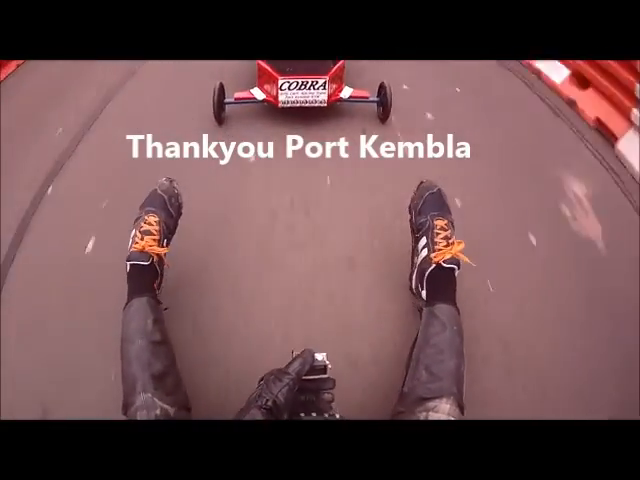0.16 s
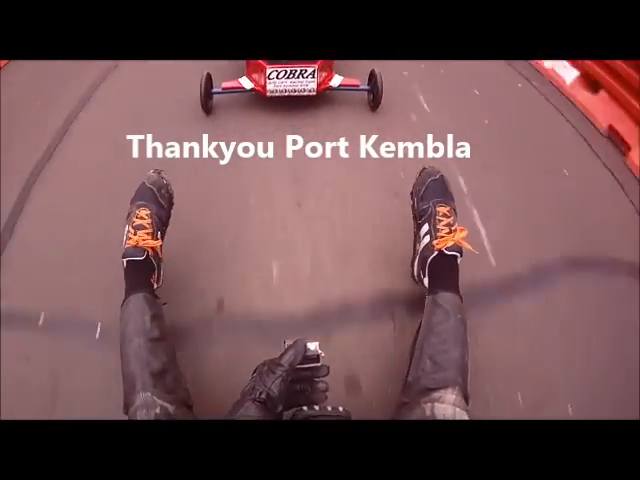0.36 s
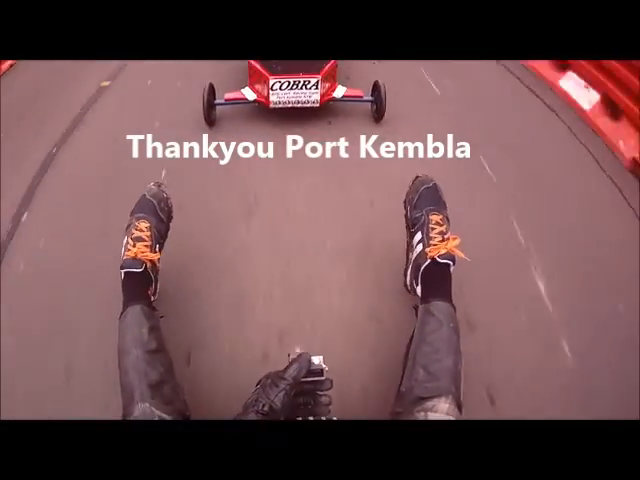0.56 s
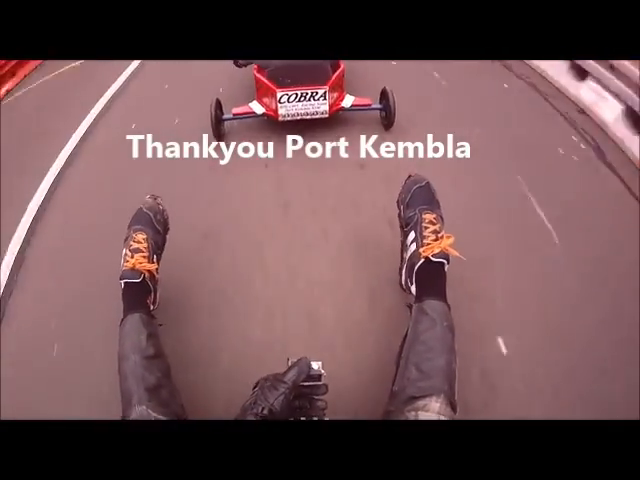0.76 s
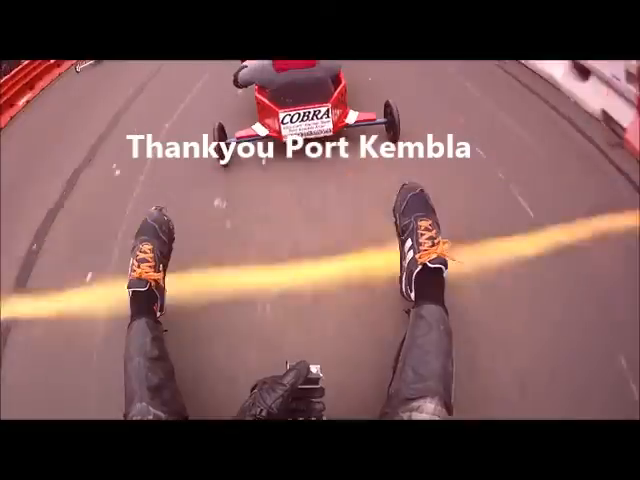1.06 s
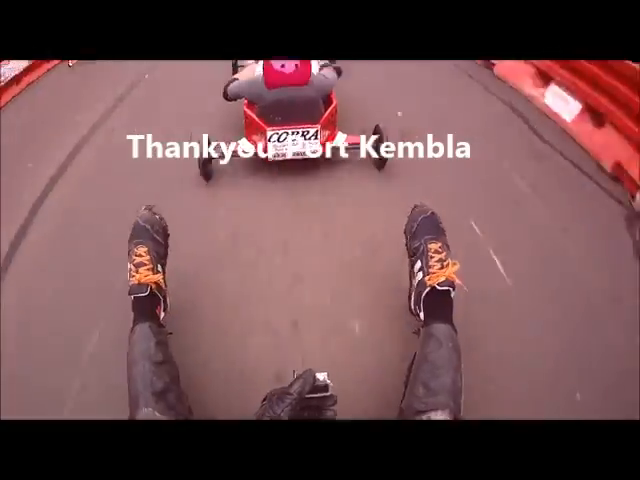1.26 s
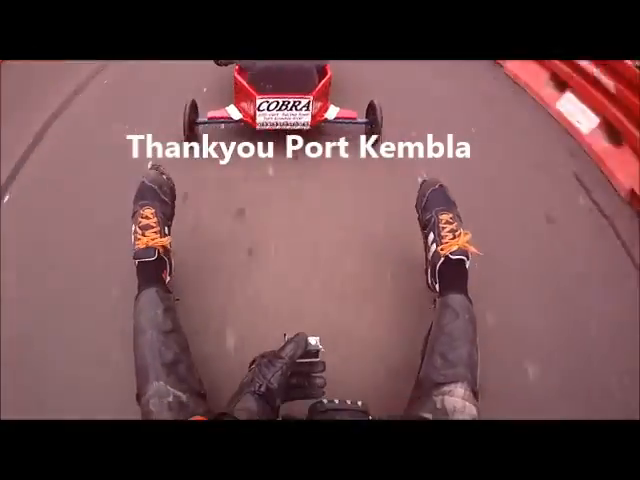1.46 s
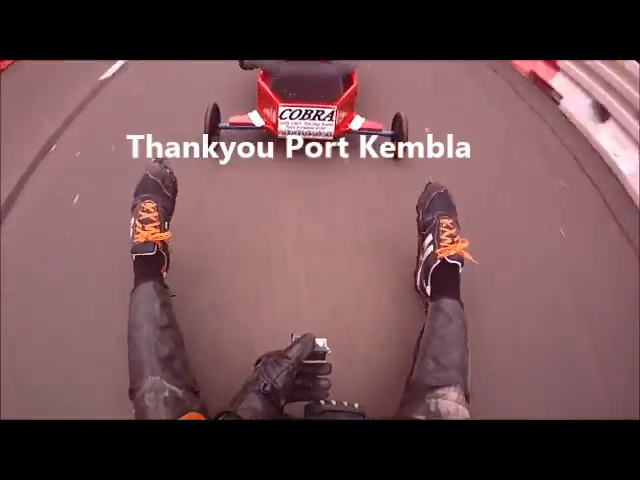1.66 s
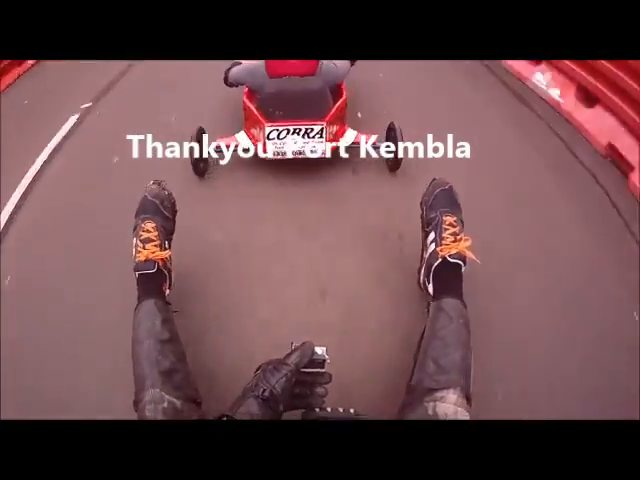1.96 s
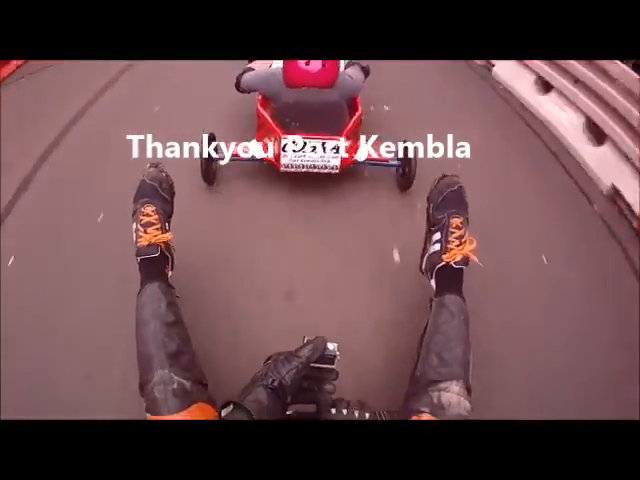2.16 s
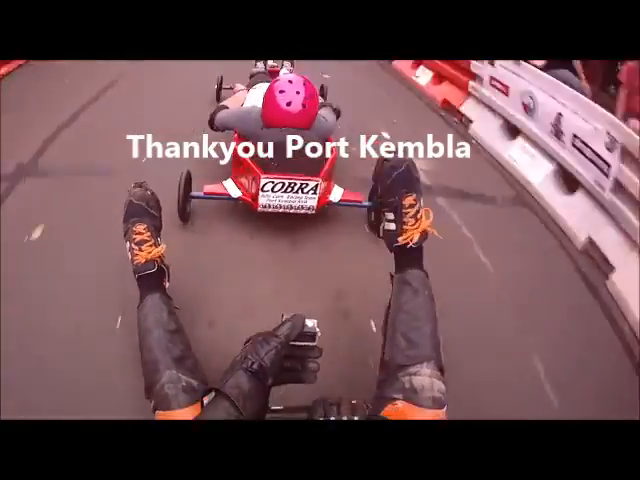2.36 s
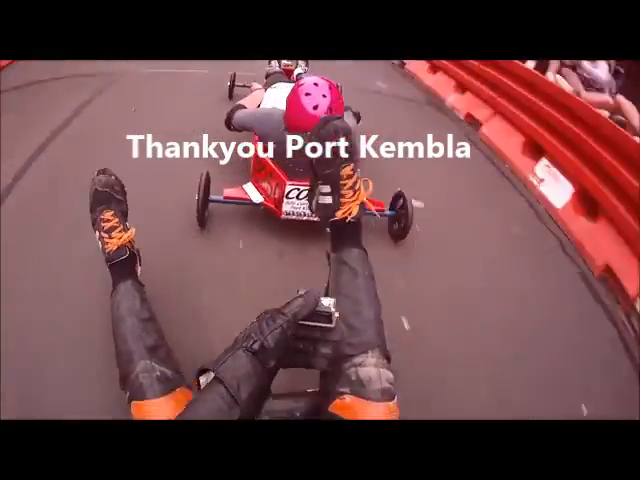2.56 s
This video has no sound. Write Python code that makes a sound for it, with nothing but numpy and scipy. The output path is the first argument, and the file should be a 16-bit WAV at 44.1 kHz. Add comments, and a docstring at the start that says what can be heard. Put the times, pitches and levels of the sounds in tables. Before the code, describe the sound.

A gravity cart rumbles down asphalt, heard from the rider's camera; wind roars and rings over the housing at first, a bump thuds, grit ticks, then wind dulls away, leaving hollow rolling and weak knocks.

```python
"""A gravity cart rolls down an asphalt road, heard from the rider's camera.
From the start the wheels drum a low rumble (shaped noise) with a gliding drone (an unsteady sine) and a boom,
while wind (moving filtered noise) rushes over the camera housing and makes it ring. Specks of grit tick faintly,
bumps jolt the frame (decaying modes), and a tyre scuffs (bursts of hiss) as the wind swells once more.
The wind then dulls and dies away; weak knocks fall at random throughout, clearer ones near the end."""
import sys
import numpy as np
from scipy import signal
from scipy.fft import rfft, irfft, next_fast_len
from scipy.io import wavfile
from scipy.ndimage import uniform_filter1d, minimum_filter1d, map_coordinates

SR = 44100
rng = np.random.default_rng(int(sys.argv[2]) if len(sys.argv) > 2 else 0)


def waveform_to_disk(signal):
    """Save audio, clipped to [-1, 1], as 16-bit WAV at the path in sys.argv[1]."""
    frames = np.transpose(np.atleast_2d(signal))
    scaled = np.clip(frames, -1, 1) * 32767
    samples = np.round(scaled).astype(np.int16)
    wavfile.write(sys.argv[1], SR, samples)


N = 119952  # length in samples


def amp(db):
    """Decibels to gain."""
    return 10 ** (np.asarray(db) / 20)


def unit(x):
    """Scaled to rms 1."""
    return x / np.sqrt(np.mean(x ** 2) + 1e-20)


def along(points, hz):
    """(Hz, value) points read on a log frequency axis."""
    f, value = np.transpose(points)
    return np.interp(np.log(hz + 1), np.log(f + 1), value)


def curve(rows, t=None, column=1):
    """One column of a time table, at every sample or at times t."""
    rows = np.asarray(rows)
    times = np.arange(N) / SR if t is None else t
    return np.interp(times, rows[:, 0], rows[:, column])


def wobble(rate):
    """A smooth random curve through `rate` random knots a second."""
    knots = rng.standard_normal(1024)
    return map_coordinates(knots, [np.arange(N) * rate / SR + 2], mode="mirror")


def filtered(x, response):
    """x times a gain that depends on frequency."""
    size = next_fast_len(N + SR // 4)
    hz = np.fft.rfftfreq(size, 1 / SR)
    return irfft(rfft(x, size) * response(hz), size)[..., :N]


def swept(x, gain_db, size=1024):
    """x through a filter that moves in time: gain_db(Hz, s)."""
    hz, t, bands = signal.stft(x, SR, nperseg=size)
    shaped = bands * amp(gain_db(hz[:, None] + 1, t))
    return signal.istft(shaped, SR, nperseg=size)[1][..., :N]


def noise(colour):
    """Nearly mono stereo noise of rms 1 with a given spectrum."""
    # stereo width of the noise: f/Hz, side relative to mid/dB
    side_width = [(35, -15), (65, -35), (160, -51), (330, -22.5), (600, -34), (1300, -24.5), (3000, -17.5),
                  (5000, -20), (9000, -11.5), (14000, -12.5)]
    mid, side = filtered(rng.standard_normal((2, N)), lambda hz: amp(along(colour, hz)))
    side = filtered(side, lambda hz: amp(along(side_width, hz)))
    return unit(np.array([mid + side, mid - side]))


def wheels():
    """The grain of the asphalt drums unevenly through the frame, over the chassis' deep boom."""
    # rumble of the wheels, before lift and shake: t/s, level/dB
    roll = [(0, -22), (.11, -22), (.3, -21), (.43, -16.5), (.57, -27), (.63, -14.5), (.73, -26),
            (.83, -15.5), (.91, -20), (1.0, -18.5), (1.15, -20), (1.27, -16.5), (1.47, -19), (1.58, -18),
            (1.9, -22), (1.98, -19.5), (2.16, -23.5), (2.3, -19), (2.55, -23), (2.68, -18.5)]
    # spectral shape of the rumble: f/Hz, relative level/dB
    rumble_colour = [(20, -47.5), (50, -29.5), (74, -19), (98, -5), (165, -0.5), (270, -1), (400, -5),
                     (620, -20.5), (1000, -34.5), (1500, -50.5), (2200, -73), (4000, -89)]
    # deep boom of the chassis: t/s, level/dB
    boom_level = [(0, -48.5), (.12, -38), (.19, -45.5), (.27, -32), (.37, -41), (.5, -44), (.68, -46.5),
                  (.8, -40.5), (.86, -31.5), (.92, -40), (1.12, -36), (1.3, -31), (1.36, -38), (1.9, -38),
                  (2.16, -39.5), (2.45, -36), (2.51, -42), (2.69, -36)]
    # spectral shape of the boom: f/Hz, relative level/dB
    boom_colour = [(18, -28), (30, -19), (39, -17.5), (48, 1), (60, 1.5), (70, -11.5), (90, -32.5),
                   (200, -91)]
    lift_db, shake_db, shakes_per_s = 0.5, 0.5, 46
    patchy_db = 1  # rms of the band swells

    def patches(hz, t):
        """Random swells of single bands, in dB."""
        field = rng.standard_normal((len(hz), len(t)))
        field = uniform_filter1d(field, size=4, axis=0)
        field = uniform_filter1d(field, size=5, axis=1)
        return patchy_db * unit(field)

    rumble = unit(swept(noise(rumble_colour), patches, size=2048))
    rumble_db = lift_db + curve(roll) + shake_db * wobble(shakes_per_s)
    boom = noise(boom_colour) * amp(curve(boom_level))
    return rumble * amp(rumble_db) + boom


def drone():
    """A hollow, narrow band glides up and down inside the rumble, unsteady in pitch and strength."""
    # path of the drone, before the pitch jitter: t/s, f/Hz, level/dB
    glide = [(0, 199.6, -27), (.17, 198.1, -29.5), (.3, 373.6, -23), (.37, 281.3, -23.5), (.45, 385.1, -22),
             (.55, 209.3, -28.5), (.62, 200.3, -20), (.74, 230, -28), (.82, 172.4, -19.5),
             (.87, 330.2, -29), (.95, 192.5, -27), (1.03, 278.5, -33), (1.07, 260, -22), (1.13, 225, -19.5),
             (1.18, 171.3, -23), (1.25, 150, -19), (1.31, 230, -24.5), (1.38, 260.5, -20.5),
             (1.47, 200, -30.5), (1.54, 214.2, -29.5), (1.62, 300, -29), (1.71, 245, -33),
             (1.78, 164.5, -27.5), (1.86, 157.9, -23), (1.93, 190.1, -26), (2.03, 278, -22),
             (2.08, 278.2, -26.5), (2.15, 184.5, -26.5), (2.3, 168.5, -22), (2.41, 172.1, -26.5),
             (2.49, 226.3, -25.5), (2.59, 249.2, -24.5), (2.68, 172.8, -25.5)]
    waver, wavers_per_s, jitter_hz = .4, 50, 15
    hz = curve(glide) + jitter_hz * wobble(wavers_per_s)
    # complex strength: amplitude and phase both waver
    strength = 1 + waver * (wobble(wavers_per_s) + 1j * wobble(wavers_per_s))
    tone = np.real(strength * np.exp(2j * np.pi * np.cumsum(hz) / SR))
    return unit(tone) * amp(curve(glide, column=2))


def wind():
    """Air over the housing: a rush and a ringing that dull as it weakens, a low roar and a thin hiss."""
    # wind, before lift, tilt and flutter: t/s, level/dB, brightness/dB per octave above the pivot
    gusts = [(0, -28, 1.2), (.08, -28, -2.5), (.25, -28.5, -3), (.33, -30.5, -3.5), (.4, -31, -3.5),
             (.49, -34.5, -4.5), (.53, -40.5, -5.5), (.66, -34, -8.5), (.76, -37.5, -7.5),
             (.79, -38.5, -6.5), (.84, -36, -9.5), (.865, -43.5, -6), (1.15, -46.5, -11),
             (1.45, -56.5, -11.5), (1.85, -65.5, -10.5), (2.69, -75.5, -14.5)]
    # spectral shape of the rush, before ripple and tilt: f/Hz, relative level/dB
    rush_colour = [(150, -43), (400, 4), (700, -2.5), (1100, -3), (1800, -4.5), (2700, -7), (3600, -13),
                   (4800, -19), (6200, -31), (9000, -59)]
    # resonances of the housing, before tilt: f/Hz, half-width at half amplitude/Hz, relative level/dB
    housing = [(638, 21, -2.5), (1168, 20, -5), (1213, 6, -8.5), (1325, 9, -0.5), (1403, 3.5, 6.5),
               (1477, 6, -5.5), (1560, 7, -5), (2154, 5, -3), (2596, 9.5, -3), (2870, 8, -5.5),
               (3270, 10, -7), (3470, 5.4, -7.5), (3820, 15, -15)]
    # low roar: t/s, level/dB
    roar_level = [(0, -29.5), (.15, -28), (.3, -21), (.5, -23), (.58, -25.5), (.68, -24), (.85, -25.5),
                  (1.1, -29), (1.5, -39), (2.69, -47.5)]
    # spectral shape of the roar: f/Hz, relative level/dB
    roar_colour = [(150, -40), (300, -8.5), (420, -2.5), (680, -10.5), (1000, -18), (2000, -50.5),
                   (4000, -92)]
    # thin hiss of the air, before flutter: t/s, level/dB
    hiss_level = [(0, -58), (.12, -63), (.28, -57.5), (.36, -58), (.49, -61.5), (.55, -68), (.7, -72.5),
                  (.9, -79), (2.69, -100)]
    # spectral shape of the hiss: f/Hz, relative level/dB
    hiss_colour = [(2000, -20.5), (5000, 1), (8500, 0), (11000, -0.5), (13000, -4), (16000, -10)]
    pivot_hz, lift_db = 1236, 1.5
    flutter_db, flutters_per_s = -1.63, 100
    ring_db, ring_growth = -33, 1.17  # level in the strongest wind before tilt; dB per dB of wind
    ripple_db, ripple_spacing_hz = 2.5, 21.56  # countless weaker resonances

    level_db = curve(gusts)

    def tilt(hz, t):
        """Brightness above the pivot, in dB."""
        octaves = np.log2(np.maximum(hz / pivot_hz, 1))
        return curve(gusts, t, column=2) * octaves

    def ripple(hz):
        """Random peaks and dips along the spectrum, as gain."""
        heights = rng.standard_normal(size=4096)
        return amp(ripple_db * map_coordinates(heights, [hz / ripple_spacing_hz], mode="mirror"))

    def modes(hz):
        """Sum of the housing's resonance peaks, as gain."""
        return sum(amp(db) / (1 + ((hz - f) / width) ** 2) for f, width, db in housing)

    rush = unit(filtered(noise(rush_colour), ripple))
    rush = swept(rush, tilt) * amp(lift_db + level_db)
    ring = unit(filtered(rng.standard_normal(N), modes))
    ring = swept(ring, tilt) * amp(ring_db + ring_growth * (level_db - level_db.max()))
    roar = noise(roar_colour) * amp(curve(roar_level))
    hiss = noise(hiss_colour) * amp(curve(hiss_level))
    flutter = amp(flutter_db * wobble(flutters_per_s))
    return (rush + hiss) * flutter + ring + roar


def noise_floor():
    """A faint, steady bed of noise."""
    # spectral shape of the floor: f/Hz, relative level/dB
    floor_colour = [(1000, -7), (5000, -9.5), (9500, -10), (13000, -2), (16000, -5.5)]
    return amp(-74) * noise(floor_colour)


def taps(events, colour):
    """Short contacts: a sharp push and a tiny scatter, through a causal filter, each scaled to its peak."""
    scatter_db, scatter_t60_s = -21.5, 0.0024
    size = 2048
    t = np.arange(size) / SR
    # folding the cepstrum makes the filter minimum phase, so the push comes first
    cepstrum = irfft(np.log(amp(along(colour, np.fft.rfftfreq(size, 1 / SR)))))
    fold = np.r_[1, np.full(size // 2 - 1, 2), np.zeros(size // 2)]
    body = np.exp(rfft(cepstrum * fold))
    out = np.zeros(N + size)
    for s, db in events:
        decay = np.exp(-np.log(1000) * t / scatter_t60_s)
        push = (t == 0) + amp(scatter_db) * rng.standard_normal(size) * decay
        tap = irfft(rfft(push) * body)
        out[round(s * SR):][:size] += amp(db) * tap / np.abs(tap).max()
    return out[:N]


def knocks():
    """Dull knocks in the frame, and many weaker ones at random moments."""
    # clearer knocks: t/s, peak level/dB
    knock_times = [(1.868, -43), (1.947, -39.5), (2.126, -40.5), (2.442, -44.5), (2.53, -43),
                   (2.534, -35.5)]
    # spectral shape of a knock: f/Hz, relative level/dB
    knock_colour = [(200, -8), (700, 8), (1400, -0.5), (2300, -20), (4000, -33.5), (9000, -53.5)]
    small_db, spread_db = -49.5, 7  # middle peak level, and how far it strays either way
    small = [(u * (N - 1) / SR, small_db + spread_db * (2 * v - 1)) for u, v in rng.random((30, 2))]
    return taps(list(knock_times) + small, knock_colour)


def grit():
    """Specks of grit hit with sharp, bright ticks."""
    # ticks: t/s, peak level/dB
    tick_times = [(.169, -32), (.172, -34.5), (.188, -27), (.257, -36.5), (.266, -34.5), (.291, -36),
                  (.499, -31.5), (.573, -41.5), (1.092, -49.5)]
    # spectral shape of a tick: f/Hz, relative level/dB
    tick_colour = [(1000, -18), (4500, 7.5), (8000, 5.5), (16000, -1)]
    return taps(tick_times, tick_colour)


def jolts():
    """Each bump rings the frame's modes briefly, a little differently every time."""
    # bumps in the road: t/s, peak level/dB
    bumps = [(0.374, -10), (.578, -18.5), (.669, -15), (.684, -20), (1.14, -23.5), (1.268, -27),
             (1.288, -22.5), (1.44, -24.5), (1.585, -27.5), (1.623, -23.5), (1.864, -24.5), (2.308, -33.5),
             (2.364, -26.5)]
    # modes of the frame, before random variation of level and pitch: f/Hz, relative level/dB, t60/s
    frame = [(414, 0, 0.12), (567, -1, 0.051), (649, 3.5, 0.03), (750, -12.5, 0.038), (955, -16, 0.01)]
    attack_s, level_spread_db, pitch_spread = .0013, 2, 0.044  # pitch spread as a share of f
    t = np.arange(SR // 8) / SR
    attack = 1 - np.exp(-(t / attack_s) ** 2)
    out = np.zeros(N + len(t))
    for s, db in bumps:
        ring = np.zeros(len(t))
        for hz, mode_db, t60 in frame:
            strength = amp(mode_db + level_spread_db * rng.standard_normal())
            pitch = hz * (1 + pitch_spread * rng.standard_normal())
            ring += strength * np.exp(-np.log(1000) * t / t60) * np.sin(2 * np.pi * pitch * t)
        ring *= attack
        out[round(s * SR):][:len(t)] += amp(db) * ring / np.abs(ring).max()
    return out[:N]


def scuffs():
    """A tyre slips sideways in a few quick bursts of hiss."""
    # slips: t/s of the onset, level/dB at the top of the burst
    slips = [(0.711, -56.5), (.752, -50.5), (.783, -59), (0.827, -58.5)]
    # spectral shape of the scuff: f/Hz, relative level/dB
    scuff_colour = [(1000, -25), (2200, -2.5), (3400, -3), (3750, 3.5), (4100, -4), (4600, -3), (6000, -19),
                    (9000, -40.5)]
    rise_s, fall_s = 0.0069, 0.016  # linear rise, exponential time constant
    t = np.arange(N) / SR
    envelope = np.zeros(N)
    for s, db in slips:
        rise = np.clip((t - s) / rise_s, 0, 1)
        fall = np.exp(-np.maximum(t - s - rise_s, 0) / fall_s)
        envelope += amp(db) * rise * fall
    return noise(scuff_colour) * envelope


def scene():
    """All layers summed, with the balance slightly to the right."""
    mix = wheels() + drone() + wind() + noise_floor()
    mix = mix + knocks() + grit() + jolts() + scuffs()
    balance_db = -.45  # left minus right
    return mix * amp([[balance_db / 2], [-balance_db / 2]])


def record(dry):
    """The camera evens out the level and limits the highest peaks; nothing passes above its band limit."""
    threshold_db, share, average_s = -19.5, 0.63, 0.024  # share of the excess dB removed
    limit_db, hold_s, top_hz = -9.3, .012, 15800
    span = int(average_s * SR)
    power = uniform_filter1d(uniform_filter1d(np.mean(dry ** 2, axis=0), span), span)
    level = np.sqrt(np.abs(power))
    even = dry * np.maximum(level / amp(threshold_db), 1) ** -share
    # the limiter's gain dips around each peak, then is smoothed
    hold = int(hold_s * SR)
    needed = np.minimum(1, amp(limit_db) / (np.abs(even).max(axis=0) + 1e-9))
    gain = minimum_filter1d(needed, hold)
    gain = uniform_filter1d(uniform_filter1d(gain, hold // 2), hold // 2)
    return filtered(even * gain, lambda hz: hz < top_hz)


dry = scene()
out = record(dry)
waveform_to_disk(out)
```